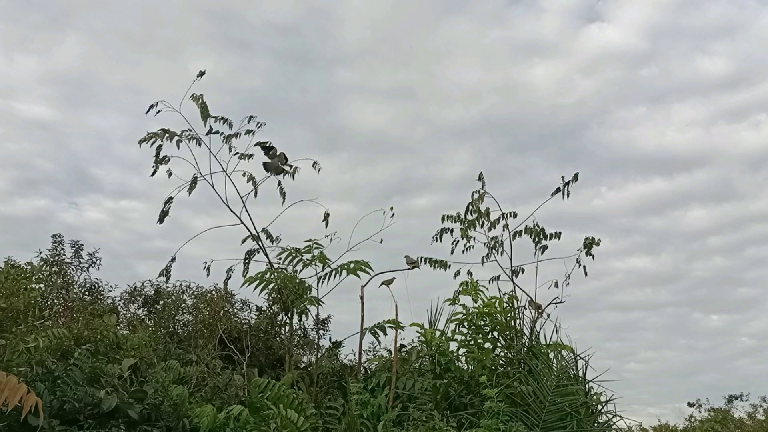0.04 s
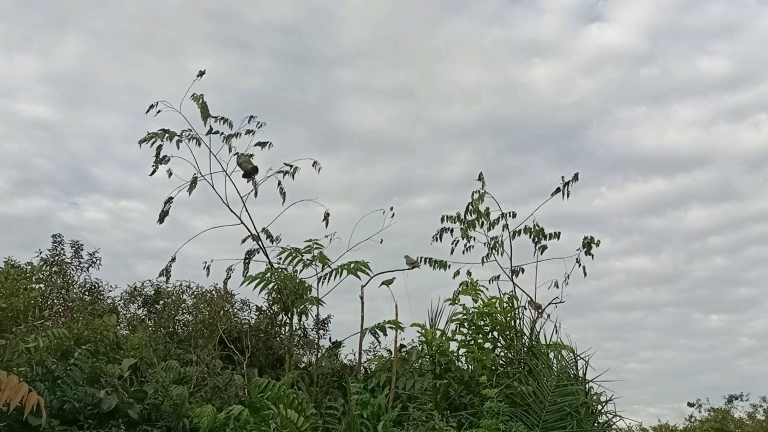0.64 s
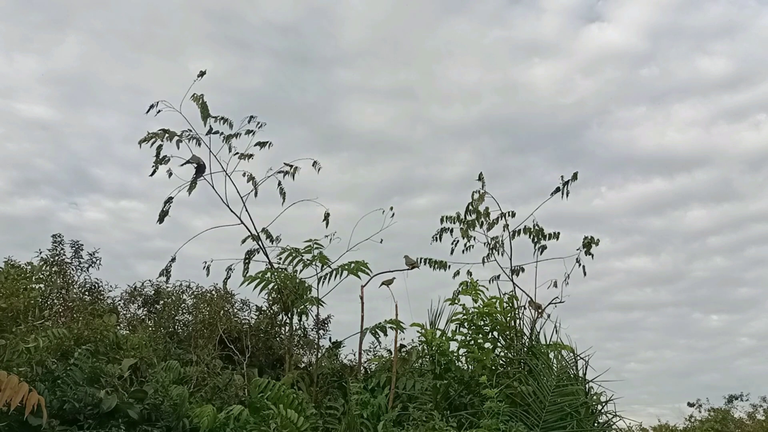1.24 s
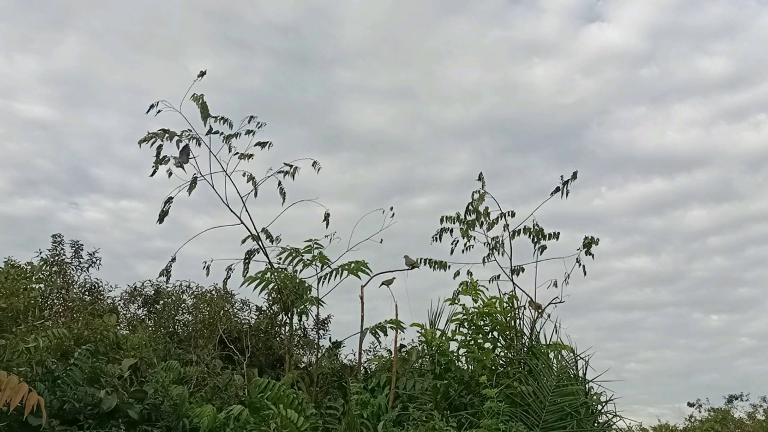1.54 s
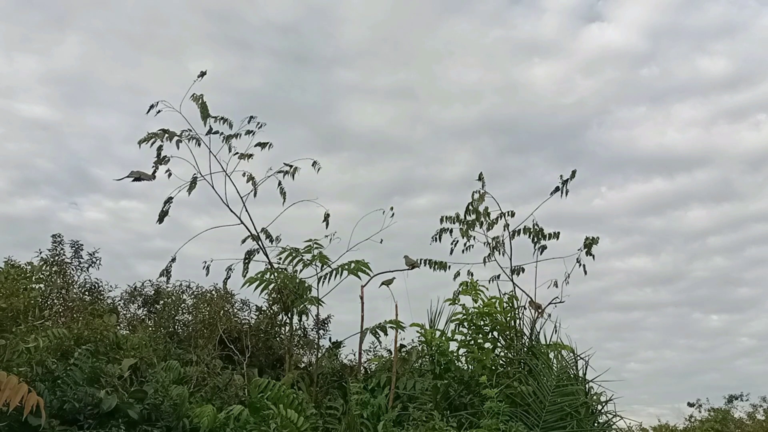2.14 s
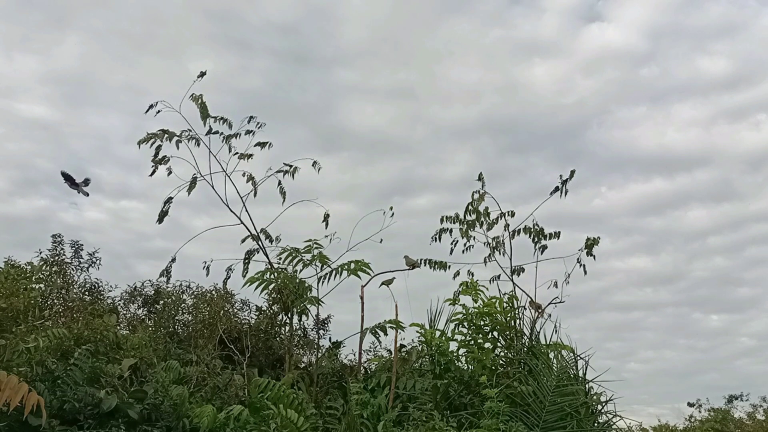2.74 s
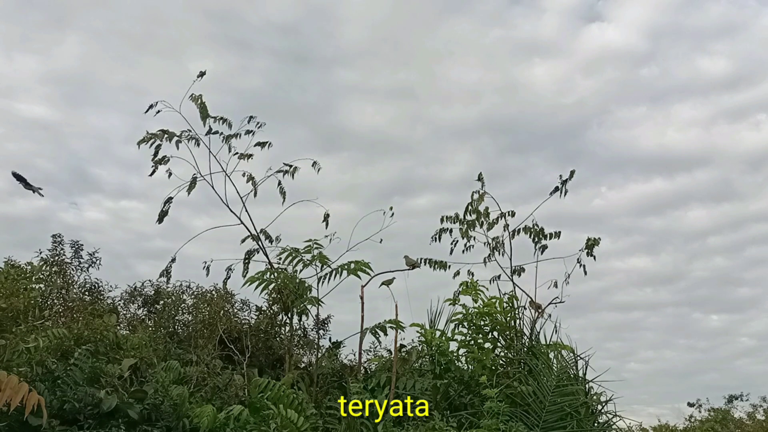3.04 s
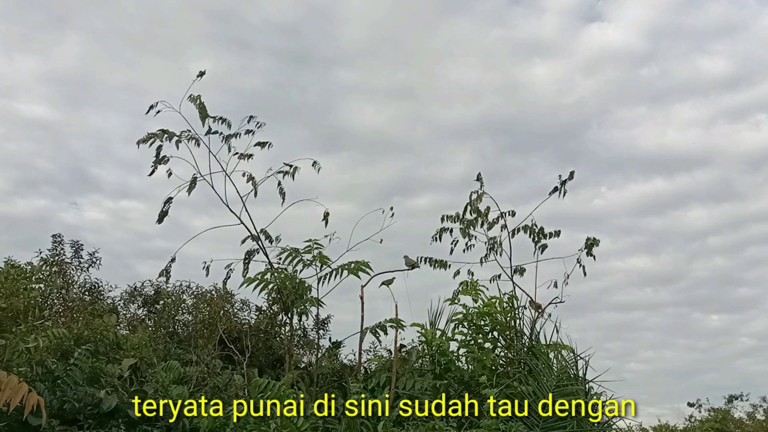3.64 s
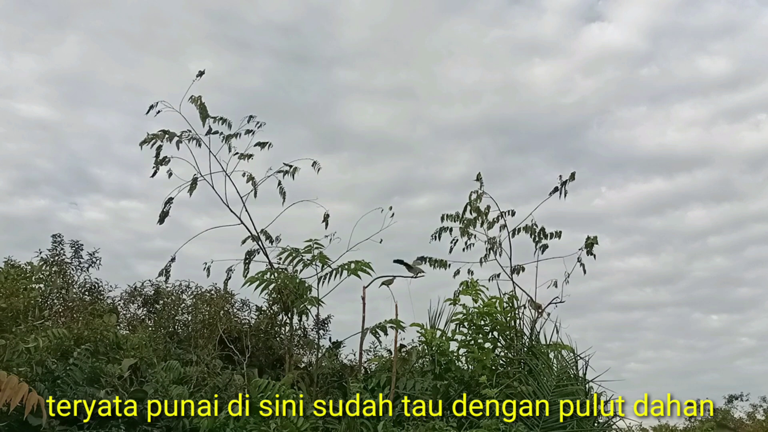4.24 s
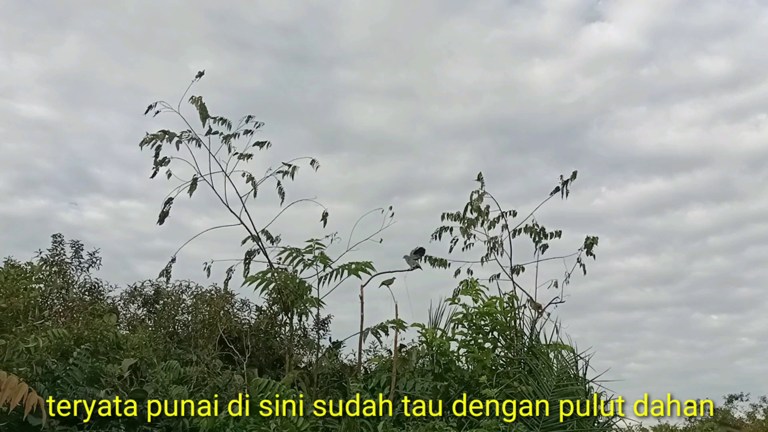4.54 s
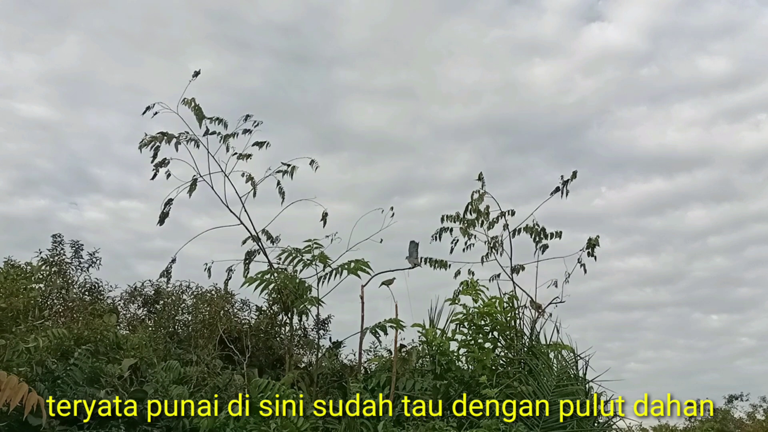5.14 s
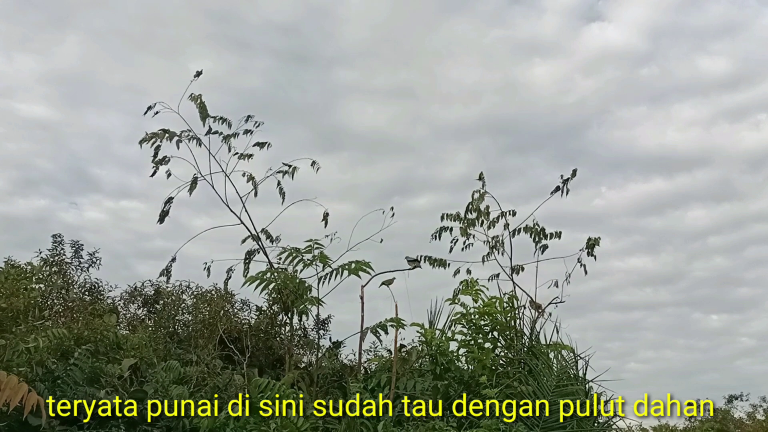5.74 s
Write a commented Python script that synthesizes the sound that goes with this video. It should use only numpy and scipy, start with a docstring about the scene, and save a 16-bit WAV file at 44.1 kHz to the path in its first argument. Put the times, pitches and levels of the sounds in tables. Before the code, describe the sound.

Outdoors, a wild pigeon whistles, gurgles, barks and ticks close by, with a faint cricket and light breeze behind.

```python
"""Open scrub, one microphone, a green pigeon close by and insects far behind it throughout.
The bird opens with gliding whistles that break into gurgles and squeals, all one membrane tone: the
throat lifts its octave, and it flutters and rattles as it grows restless. From 3.5 s come four harsh
barks, while a cricket turns from trill to chirps. Leaves rustle once at 4.6 s. Then runs of dry ticks
swell into a rasp, and three more ticks end the song."""
import sys
import numpy as np
from scipy import signal
from scipy.fft import rfft, irfft
from scipy.io import wavfile
from scipy.ndimage import uniform_filter1d

SR = 44100
rng = np.random.default_rng(int(sys.argv[2]) if len(sys.argv) > 2 else 0)


def file_out(sig):
    """Save sig as 16-bit WAV at sys.argv[1]."""
    # one column per channel
    cols = np.atleast_2d(sig).T
    # limit, then scale
    lim = np.clip(cols, -1, 1)
    pcm = np.round(lim * 32767).astype(np.int16)
    wavfile.write(sys.argv[1], SR, pcm)


N = 254898
T = np.arange(N) / SR
NOTE_T = np.arange(700) / 1000  # seconds into a note


def amp(db):
    return 10 ** (np.asarray(db) / 20)


def unit_rms(x):
    return x / np.sqrt(np.mean(x ** 2) + 1e-20)


def curves(rows):
    """Each column of a table, joined by straight lines in time."""
    times, *columns = np.transpose(rows)
    return [np.interp(T, np.sort(times), c) for c in columns]


def colour(x, points):
    """Filters by a spectrum of (freq_hz, gain_db) points."""
    hz, db = np.transpose(points)
    gain_db = np.interp(np.log(np.fft.rfftfreq(N, 1 / SR) + 1), np.log(hz), db)
    return irfft(rfft(x) * amp(gain_db), N)


def wander(hz):
    """Smooth random drift of unit size, up to about the given rate."""
    lowpass = np.exp(-(np.fft.rfftfreq(N, 1 / SR) / hz) ** 2)
    return unit_rms(irfft(rfft(rng.standard_normal(N)) * lowpass, N))


def phase_of(hz):
    return 2 * np.pi * np.cumsum(hz * np.ones(N)) / SR


def bump(at_s, width_s):
    return np.exp(-((T - at_s) / width_s) ** 2)


def steadied(x, size=1500):
    """Takes the slow level out and leaves the fast pulsing."""
    return x / np.sqrt(abs(uniform_filter1d(uniform_filter1d(x ** 2, size), size // 2)) + 1e-9)


# colour of the throat and beak: freq_hz, gain_db
THROAT_COLOUR = [(250, -72), (520, -14.5), (720, -5), (3480, 1), (3800, -21), (7000, 2)]
# colour of the overtones and hiss: freq_hz, gain_db
EDGE_COLOUR = [(400, -43.5), (1300, 22.5), (3300, -6.5), (4300, 12), (5200, 9.5), (8000, -14), (10000, -1),
               (15000, -45.5)]

def pigeon_song(arch=.12, sweep=.27, kick=.09, rattle_hz=380, rattle_bend_rad=.35, ceiling=1.64,
                overtone_db=-20, hiss_db=-27):
    """The near bird's membrane: each flutter arches pitch and level; a fast rattle makes it harsh."""
    pitch, low_db, high_db, unrest, flutter_hz, lean, rattle_share, edge_db = phrases()
    low, high = amp(low_db), amp(high_db)  # fundamental and octave
    unrest = np.maximum(unrest, 0)
    rasp = unrest * np.maximum(rattle_share, 0)
    flutter = unrest * (1 - .78 * rattle_share)
    beat = phase_of(flutter_hz * (1 + .2 * wander(50)))
    rattle = phase_of(rattle_hz * (1 + .17 * wander(140)))
    surge_db, leap = pressure_surges()
    flutter_bend = flutter * (arch * (np.cos(beat) - .45) + sweep * lean * np.sin(beat))
    bend = flutter_bend + kick * leap * np.sqrt(unrest) + .0048 * wander(63)
    # the rattle shakes whichever partial is loudest by about the same amount
    shake = rasp * (rattle_bend_rad * np.sin(rattle) + wander(210))
    phase = phase_of(pitch * (1 + bend)) + shake * (low + high) / (low + 2 * high)
    # the swing nearly stops once in each flutter, rattles strong-weak, and cannot grow without limit
    throb = .75 * np.cos(beat) - .2 * np.cos(2 * beat) + .5 * wander(150)
    push = steadied(np.exp(flutter * throb + rasp * (np.cos(rattle) + np.cos(rattle / 2) / 2)))
    push = steadied(amp(surge_db) * np.tanh(push / ceiling))
    tone = np.sqrt(2) * push * (low * np.cos(phase) + high * np.cos(2 * phase))
    # a steady, hard-driven membrane flattens its swing, which adds odd overtones
    level = np.hypot(low, high) * push + 1e-9
    swing = tone / level / np.sqrt(2)
    overtones = level ** 2 / (level + .05) * (4 * swing ** 3 - 3 * swing) / (1 + 2 * rasp)
    hiss = (.2 + rasp / 2) * level * rng.standard_normal(N)
    edge = amp(edge_db) * (amp(overtone_db) * overtones + amp(hiss_db) * hiss)
    return colour(tone, THROAT_COLOUR) + colour(edge, EDGE_COLOUR)


# cracks and squeaks in the song: time_s, lift_db
SURGES = [(0.019, 3.5), (.04, 1.5), (.343, 4), (.376, 4), (.402, 2), (0.652, 0), (0.667, 5.5), (.685, 9),
          (.704, 10), (0.725, 9), (0.775, 1.5), (1.081, 5.5), (1.117, 2), (1.454, 7.5), (1.801, 5.5),
          (2.279, 6.5), (2.304, 4), (2.342, 5.5), (2.407, 7), (5.362, 13), (5.427, 6)]

def pressure_surges():
    """The tone briefly chokes and dips in pitch, then leaps louder and higher."""
    surge_db = sum(db * (bump(s, .006) - 2.6 * bump(s - .008, .002)) for s, db in SURGES)
    leap = sum(bump(s - .002, .003) - bump(s - .01, .0062) for s, _ in SURGES)
    return surge_db, leap


def phrases(slur_s=.006):
    """One voice sings all the notes: each takes over from the last with a quick slur."""
    notes = [whistle(), closing_rasp()] + [fall(*row) for row in FALLS]
    notes += [squeal(*row) for row in SQUEALS] + [bark(*row) for row in BARKS]
    notes.sort(key=lambda rows: rows[0, 0])
    ends = [rows[0, 0] for rows in notes[1:]] + [np.inf]
    sung = np.vstack([rows[rows[:, 0] < end] for rows, end in zip(notes, ends)])
    return [uniform_filter1d(c, round(slur_s * SR)) for c in curves(sung)]


def note(start_s, pitch_hz, low_db, high_db, unrest, manner):
    """A note's controls, a row each millisecond; unrest runs from 0 (pure) to 1 (rough)."""
    return np.column_stack(np.broadcast_arrays(start_s + NOTE_T, pitch_hz, low_db, high_db, unrest, *manner))


# a manner is how unrest shows: flutter_hz, lean (- falls, + rises), rattle_share, edge_db
WHISTLE_MANNER = (48, -1, .72, -1.5)
# the opening whistle: time_s, pitch_hz, level_db
WHISTLE = [(0.06, 970, -32), (0.096, 941, -32.5), (0.178, 947, -27), (0.296, 1108, -18), (0.354, 1075, -19),
           (0.396, 1133, -22), (0.41, 1002, -21)]

def whistle(gain_db=1.5, octave_db=-24, restless_db=22, calm=.02, restless=.593, onset_s=.0869):
    """A pure tone that swells and rises, then starts to flutter."""
    times, hz, db = np.transpose(WHISTLE)
    t = times[0] + NOTE_T
    low_db = np.interp(t, times, db) + gain_db
    unrest = np.interp(t, [times[-1] - onset_s, times[-1]], [calm, restless])
    high_db = low_db + octave_db + restless_db * unrest
    return note(times[0], np.interp(t, times, hz), low_db, high_db, unrest, WHISTLE_MANNER)


GURGLE_MANNER = (80, .99, .5, 3.86)
BREAK_HZ, BREAK_WIDTH_HZ = 880, 18
LOCK_HZ, LOCK_WIDTH_HZ, LOCK_SHARE = 1552, 69.5, .703  # a throat resonance steadies the passing octave
# falling whistles: start_s, length_s, first_hz, last_hz, glide_s, first_db, last_db,
# first_unrest, last_unrest, fade_s
FALLS = [(0.0, 0.045, 1400, 1240, 0.054, -36.5, -30.5, 0.43, 0.48, .05),
         (1.008, 0.12, 1544, 1393, 0.093, -19, -22, 0.02, 0.36, .05),
         (1.132, .255, 1049, 826.5, .09, -24.5, -19.5, 0, .6, .05),
         (1.657, 0.48, 1184, 576.7, .15, -18.5, -20.5, 0.02, 0.79, 0.11),
         (2.361, 0.4, 1052, 540.5, .11, -20, -18.5, .1, 0.74, 0.14),
         (3.029, .08, 1220, 1033, 0.1, -24, -20.5, 0.8, 0.6, .05),
         (3.106, 0.391, 780.5, 519, .09, -19, -20.5, 0.9, .7, 0.011)]

def fall(start_s, length_s, first_hz, last_hz, glide_s, first_db, last_db, first_unrest, last_unrest,
         fade_s, octave_db=-25, restless_db=16, gurgle_low_db=-13.5, gurgle_high_db=-3.4, fade_db=-30):
    """A whistle slides down; below the break the throat lifts the octave and it turns to a gurgle."""
    pitch = last_hz + (first_hz - last_hz) / (1 + (NOTE_T / glide_s) ** 2)
    gurgle = (1 + np.tanh((BREAK_HZ - pitch) / BREAK_WIDTH_HZ / 2)) / 2
    unrest = last_unrest + (first_unrest - last_unrest) * np.exp(-(NOTE_T / glide_s / .93) ** 2)
    unrest *= 1 - LOCK_SHARE * np.exp(-((2 * pitch - LOCK_HZ) / LOCK_WIDTH_HZ) ** 2)
    level_db = np.interp(NOTE_T, [0, length_s], [first_db, last_db])
    level_db += fade_db * np.maximum(NOTE_T - length_s, 0) / fade_s
    high_db = level_db + (1 - gurgle) * (octave_db + restless_db * unrest) + gurgle * gurgle_high_db
    manner = [a + (b - a) * gurgle for a, b in zip(WHISTLE_MANNER, GURGLE_MANNER)]
    return note(start_s, pitch, level_db + gurgle * gurgle_low_db, high_db, unrest, manner)


# squeals between the whistles: start_s, length_s, first_hz, last_hz, first_db, middle_db, last_db,
# clean_s, last_unrest, rattle_share
SQUEALS = [(.418, 0.21, 1118, 1530, -29, -27, -22.5, 0.0013, 0.8, .95),
           (.612, .188, 1740, 1520, -23.5, -28.5, -29.5, 0.12, 1, .45),
           (.8, .214, 1288, 1270, -35, -32, -20.5, 0.0024, 0.45, .85),
           (1.39, 0.31, 1185, 1340, -22, -31, -19, .06, 0.88, .45),
           (2.168, 0.1967, 1149, 1130, -35.5, -30, -20, 0.003, 0.3, .5),
           (2.94, 0.099, 1100, 1200, -41, -36.5, -32, 0.0016, 1, 0.66)]

def squeal(start_s, length_s, first_hz, last_hz, first_db, middle_db, last_db, clean_s, last_unrest,
           rattle_share, clean_low_db=-14, rough_low_db=-.2, edge_db=-1):
    """The octave rings, breaks up into a rasp and may steady again as the pitch bends at the end."""
    progress = np.minimum(NOTE_T / length_s, 1)
    pitch = first_hz + (last_hz - first_hz) * progress ** 3
    settling = 1 + (last_unrest - 1) * progress ** 3
    unrest = (1 - np.exp(-(NOTE_T / clean_s) ** 2)) * settling
    high_db = np.interp(progress, [0, .5, 1], [first_db, middle_db, last_db])
    low_db = high_db + clean_low_db + (rough_low_db - clean_low_db) * unrest
    flutter_hz, lean = 70 + 18 * rattle_share, .98 * (2 * progress - 1)
    manner = flutter_hz, lean, rattle_share * settling, edge_db
    return note(start_s, pitch, low_db, high_db, unrest, manner)


BARK_MANNER = (66.5, .85, .7345, -1)
# the course of one bark: length_share, pitch_factor, fundamental_db, octave_db
BARK_SHAPE = [(-.09, 1.15, -29, -24), (.03, 0.91, -11.5, -7), (0.202, 1, 3.5, -17.5), (0.982, 1, 5, -24),
              (1.1, 1, -23, -54), (1.248, 1.2, -62, -63)]
# four barks: start_s, length_s, pitch_hz, level_db
BARKS = [(3.546, 0.143, 1107, -25), (3.761, 0.15, 1088, -26.5), (3.988, 0.1677, 1150, -28.5),
         (4.237, .18, 1390, -25.5)]

def bark(start_s, length_s, pitch_hz, level_db):
    """A squeak, then a short, fully rough burst."""
    shares, *shape = np.transpose(BARK_SHAPE)
    factor, low_db, high_db = [np.interp(shares[0] + NOTE_T / length_s, shares, c) for c in shape]
    onset_s = start_s + shares[0] * length_s
    return note(onset_s, pitch_hz * factor, level_db + low_db, level_db + high_db, 1, BARK_MANNER)


RASP_MANNER = (210, 1.7, 1.26, -6.5)
# the closing rasp: time_s, pitch_hz, fundamental_db, octave_db, unrest
RASP = [(5.332, 1615, -66, -61.5, 1), (5.363, 1602, -22.5, -39, 0.55), (5.473, 1601, -14.5, -31, 0.64),
        (5.562, 1585, -23.5, -39.5, 0.78), (5.611, 1520, -89, -100, 0.2)]

def closing_rasp():
    """One swelling, rattling note takes over from the ticks."""
    times, *shape = np.transpose(RASP)
    return note(times[0], *[np.interp(times[0] + NOTE_T, times, c) for c in shape], RASP_MANNER)


# runs of dry ticks: start_s, count, first_db, last_db
TICK_RUNS = [(4.7102, 8, -35.5, -19), (4.93, 1, -26, -28), (4.984, 11, -30.5, -14), (5.688, 3, -25, -19)]

def tick_runs(gap_s=.034, swell_power=.35):
    """The time and level of every tick, evenly spaced and swelling through its run."""
    return [(start_s + k * gap_s, first_db + (last_db - first_db) * progress ** swell_power)
            for start_s, count, first_db, last_db in TICK_RUNS
            for k, progress in enumerate(np.linspace(0, 1, round(count)))]


# a tick's opening snap against its ring: time_s, snap_db
TICK_SNAP = [(4.91, -22.5), (4.93, -11.5), (5.33, -11.5), (5.69, -23.5)]

def pigeon_ticks(pitch_hz=1560, sag=.069, delay_s=.00445, rise_s=.00094, ring_s=.0032,
                 gain_db=3, third_db=-19):
    """Single short puffs set the same membrane ringing for a few cycles, its pitch sagging."""
    track = np.zeros(N + SR)
    t = np.arange(1100) / SR - delay_s
    for start_s, db in tick_runs():
        detune, ring_phase, snap_phase, stretch = rng.standard_normal(4)
        hz = pitch_hz * (1 + .034 * detune - sag * np.tanh(t / ring_s))
        phase = 2 * np.pi * np.cumsum(hz) / SR
        swell = np.exp(-(t / np.where(t < 0, rise_s, ring_s * np.exp(.2 * stretch))) ** 2)
        ring = swell * (np.cos(phase + ring_phase) + amp(third_db) * swell * np.cos(3 * phase))
        ragged = 1.84 * np.sin(phase / 4 + 2 * stretch)
        snap = np.exp(-((t + .0001) / .003) ** 2) * np.cos(1.4 * phase + snap_phase + ragged)
        snap_db = np.interp(start_s, *np.transpose(TICK_SNAP))
        track[round(start_s * SR):][:len(t)] += amp(db + gain_db) * (ring + amp(snap_db) * snap)
    return colour(track[:N], THROAT_COLOUR)


def bushes(bird, wet_db=-24, t60_s=.16):
    """Foliage around the bird scatters a thin, short tail back to the microphone."""
    t = np.arange(SR // 2) / SR
    taps = rng.standard_normal(len(t)) * (rng.random(len(t)) < .05)
    taps *= (t > .004) * amp(-60 * t / t60_s)
    return bird + amp(wet_db) * signal.fftconvolve(bird, taps / np.linalg.norm(taps))[:N]


def cricket(pitch_hz=7010, level_db=-48, octave_db=-17, stroke_hz=71, chirp_hz=16.7, change_s=3.49):
    """Wing strokes behind the bird: first a broken trill, later short chirps that slide up to pitch."""
    chirp = (1 + np.cos(phase_of(chirp_hz))) / 2
    trill = 1 / (1 + np.exp(-5 * (wander(9) + .6)))
    gate = np.where(T < change_s, trill, .25 + chirp)
    slide = (T > change_s) * .14 * (1 - chirp) ** 2
    phase = phase_of(pitch_hz * (1 + .0025 * wander(87) - slide))
    strokes = np.cos(phase_of(stroke_hz * (1 + .037 * wander(20))) / 2) ** 4
    return amp(level_db) * gate * strokes * (np.cos(phase) + amp(octave_db) * np.cos(2 * phase))


# breeze and far insects: freq_hz, gain_db
AIR_COLOUR = [(70, 2), (400, -8.5), (3500, -20), (5600, -35), (6500, -4.5), (7200, -4), (7900, -25),
              (11500, -30), (13500, -14.5), (15000, -63)]

def scrub_air(level_db=-56):
    """A faint breeze and a distant insect chorus, drifting in level."""
    return amp(level_db + 3.6 * wander(3.8)) * unit_rms(colour(rng.standard_normal(N), AIR_COLOUR))


# rustling leaves: freq_hz, gain_db
LEAF_COLOUR = [(50, -3), (200, -13), (600, -10), (1100, -21.5), (4000, -38), (14000, -34)]

def leaf_rustle(at_s=4.605, width_s=.045, level_db=-50):
    """The leaves shiver once, softly."""
    leaves = unit_rms(colour(rng.standard_normal(N), LEAF_COLOUR))
    return amp(level_db + 3 * wander(50)) * bump(at_s, width_s) * leaves


def scene():
    """The pigeon in front, the scrub behind, in mono."""
    return (bushes(pigeon_song() + pigeon_ticks()) + cricket() + scrub_air() + leaf_rustle())[None]


def record(dry, cutoff_hz=15600):
    """The recorder's band limit."""
    lowpass = signal.firwin(511, cutoff_hz, window=("kaiser", 9), fs=SR)
    return signal.oaconvolve(dry, lowpass[None], "same")


dry = scene()
out = record(dry)
file_out(out)
```